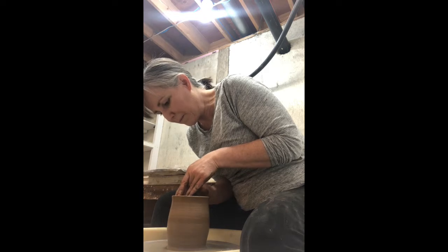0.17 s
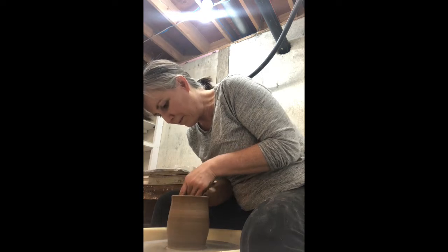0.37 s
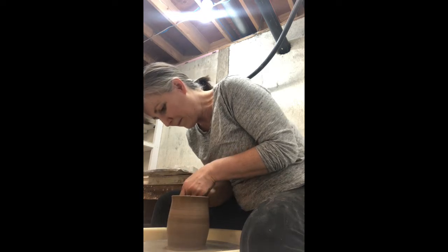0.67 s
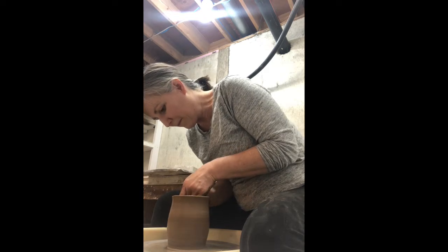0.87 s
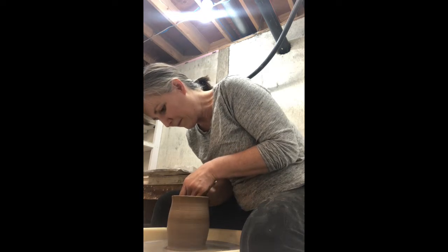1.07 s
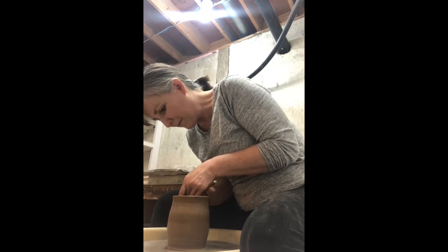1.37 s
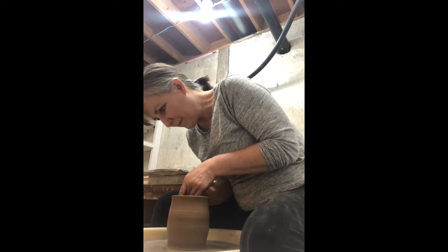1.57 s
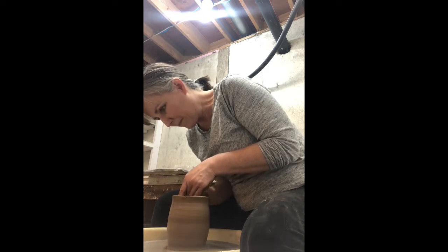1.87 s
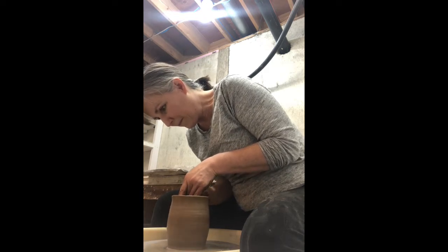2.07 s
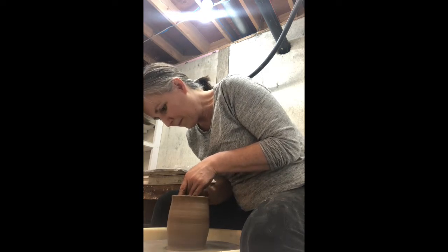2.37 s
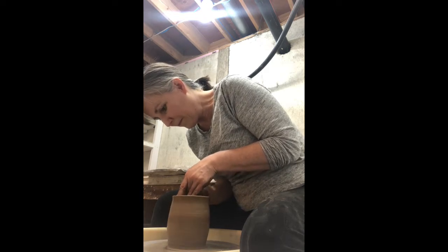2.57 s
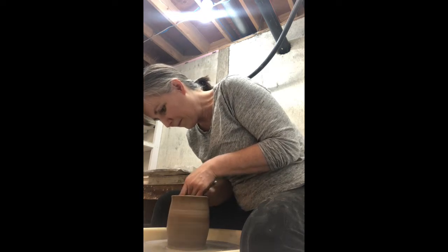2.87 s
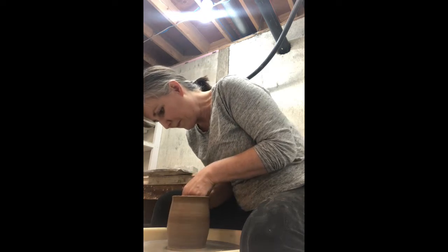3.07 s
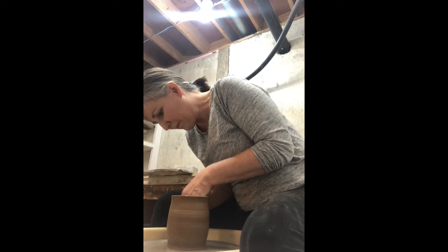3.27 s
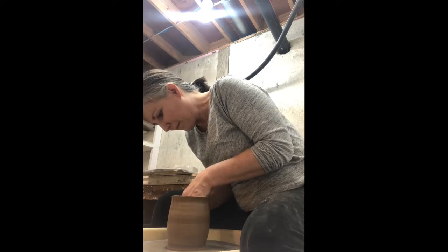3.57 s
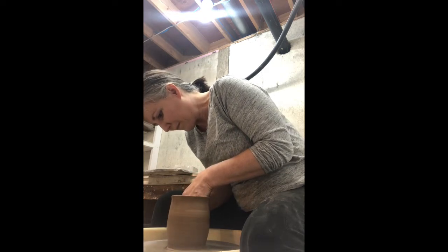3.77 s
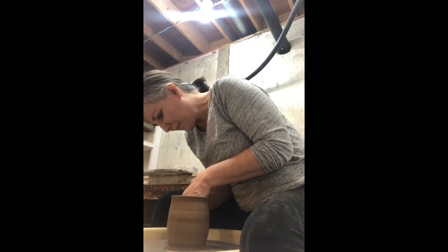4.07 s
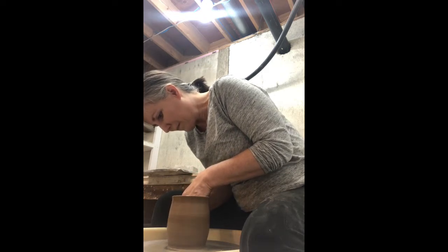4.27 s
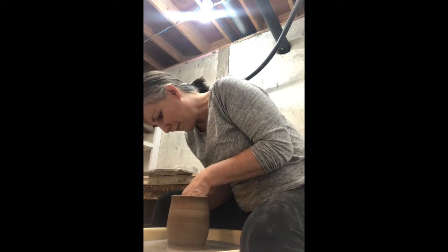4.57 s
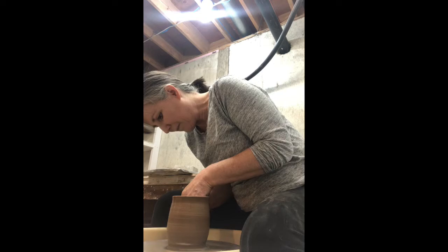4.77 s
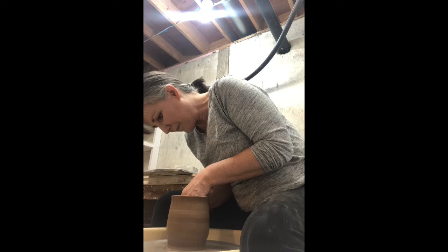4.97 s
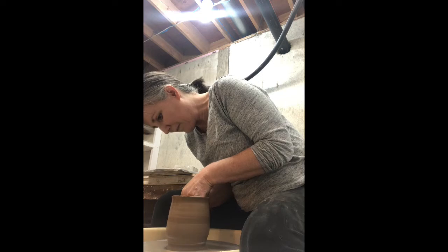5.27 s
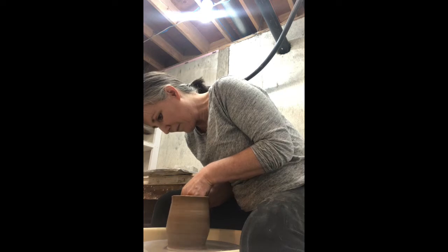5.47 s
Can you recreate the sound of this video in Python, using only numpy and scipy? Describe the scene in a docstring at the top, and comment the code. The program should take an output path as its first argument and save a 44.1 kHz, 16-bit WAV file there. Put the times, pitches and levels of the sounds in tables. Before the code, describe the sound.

From 0 to about 5.7 seconds an electric potter's wheel runs continuously at steady speed, heard close by in a quiet studio. The strongest element is a deep, smooth motor hum around 120 hertz, swelling gently about 2.4 times a second as the wheel head turns. Woven into it is a fast mechanical purr: a cycle repeating about ten times a second, packed with uneven little knocks, catches and rubbing, coloured by hollow housing resonances between roughly 150 and 1250 hertz. Bearings add a soft, grainy low rumble. Faint steady tones and thin metallic singing lie above, with a weak flickering whine near 5.2 kilohertz. From about 0.5 seconds, a minute, almost inaudible squeak near 15 kilohertz recurs every 0.42 seconds, uneven in strength. Slight hiss fills the background. Nothing starts, stops or changes speed; no voice, no distinct handling of clay, and little sense of echo.

```python
"""Electric potter's wheel at steady speed

The motor hums at twice the mains rate and swells a little as each turn of the wheel head loads it.
Its drive knocks, catches and rubs in one looped shaft turn, coloured by the ringing housing and frame.
Bearings rumble as shaped noise; steady sines give machine tones and a thin, flickering whine.
A tiny high squeak returns with every turn of the wheel head, over the even hiss of a quiet studio."""
import sys
import numpy as np
from scipy import signal
from scipy.fft import rfft, irfft
from scipy.io import wavfile

SR = 44100
rng = np.random.default_rng(int(sys.argv[2]) if len(sys.argv) > 2 else 0)


def transcribe(signal):
    """Save signal, clipped to [-1, 1], as a 16-bit WAV file at the path in sys.argv[1]."""
    frames = np.atleast_2d(signal).T
    limited = np.clip(frames, -1, 1)
    pcm = np.round(limited * 32767).astype(np.int16)
    wavfile.write(sys.argv[1], SR, pcm)


N = 248283
TIME = np.arange(N) / SR  # s
FREQS = np.arange(N // 2 + 1) * SR / N  # Hz
SHAFT_HZ, HEAD_HZ = 10.3219, 2.362  # turns per second of the motor shaft and the wheel head


def from_db(db):
    """Decibels to amplitude gain."""
    return 10 ** (np.asarray(db) / 20)


def at_hz(points, hz):
    """Read a spectrum table, with straight lines between points on a log-frequency axis."""
    table_hz, level = np.transpose(points)
    return np.interp(np.log(np.maximum(hz, 1)), np.log(table_hz), level)


def noise(level_db):
    """White noise shaped to the given dB per Hz along FREQS."""
    white = rfft(rng.standard_normal(N))
    return irfft(white * from_db(level_db), N) * np.sqrt(SR / 2)


def drift(rate):
    """Smooth random wander of spread 1 that changes about `rate` times a second."""
    slow = noise(-40 * np.log10(1 + (FREQS / rate) ** 2))
    return slow / slow.std()


def tone(hz, level_db, wander):
    """A sine from a random phase, which then wanders by a spread of `wander` radians."""
    phase = 2 * np.pi * (hz * TIME + rng.random()) + wander * drift(rate=4.5)
    return from_db(level_db) * np.sin(phase)


def frame_db(hz):
    """Lift in dB given by the frame, each resonance a rounded peak around its own pitch."""
    # frame resonances that colour drive and bearings: (centre [Hz], width [Hz], lift [dB])
    resonances = [(171, 7.1, 1), (570, 13, 7.5), (1273, 26, 6.5), (1714, 27, 8), (2406, 28, 10.5),
                  (2813, 39, 10), (3143, 430, 11.5), (3954, 434, 10)]
    return sum(lift_db / (1 + (2 * (hz - centre_hz) / width_hz) ** 2)
               for centre_hz, width_hz, lift_db in resonances)


def studio_hiss():
    """Even background hiss of the quiet studio, as steady shaped noise."""
    # hiss spectrum: (frequency [Hz], level [dB per Hz])
    hiss_spectrum = [(1000, -113), (10000, -120), (15700, -128)]
    return noise(at_hz(hiss_spectrum, FREQS))


def squeaks(first_s=.475, pitch_hz=14950, length_s=.006, level_db=-87, uneven_db=4):
    """A very high, short squeak each time the wheel head comes round, at randomly uneven strength."""
    times = first_s + np.arange(int(N / SR * HEAD_HZ)) / HEAD_HZ
    swell = 0
    for squeak_s in times:
        strength = from_db(uneven_db * rng.standard_normal())
        swell = swell + strength * np.exp(-((TIME - squeak_s) / length_s) ** 2)
    return swell * tone(pitch_hz, level_db, wander=0.89)


def whine(pitch_hz=5228, middle_db=-76.5, flicker_db=1.8):
    """Thin high sine whose level flickers quickly around its middle."""
    return tone(pitch_hz, middle_db + flicker_db * drift(rate=41), wander=0.58)


def machine_tones():
    """Steady sines of the machine that do not follow the shaft."""
    # fixed tones: (frequency [Hz], peak level [dB])
    fixed_tones = [(53.2, -56), (140.6, -53), (149.6, -53), (161.3, -63), (591.5, -66.5), (1042, -60.5),
                   (1157, -70), (1318, -62)]
    return sum(tone(hz, db, wander=0.064) for hz, db in fixed_tones)


def bearings(flicker_db=0.57):
    """Rolling noise that never repeats, coloured by the frame and rippled by the shaft."""
    # rumble and hiss of bearings and belt before the frame lifts it: (frequency [Hz], level [dB per Hz])
    rumble_spectrum = [(25, -112), (42, -85), (55, -75.5), (100, -76), (150, -63), (215, -77), (600, -77.5),
                       (950, -84.5), (1300, -81), (2100, -99), (3600, -107), (5400, -108), (7900, -114),
                       (8500, -128)]
    # level ripple in step with the shaft: (ripples per turn [count], depth [dB])
    shaft_ripple = [(1, .25), (4, .3), (12, .25)]
    ripple_db = sum(depth_db * np.cos(2 * np.pi * (round(per_turn) * SHAFT_HZ * TIME + rng.random()))
                    for per_turn, depth_db in shaft_ripple)
    rolling = noise(at_hz(rumble_spectrum, FREQS) + frame_db(FREQS))
    return rolling * from_db(ripple_db + flicker_db * drift(rate=6.6))


def hum(hum_hz=120.05, swing_db=0.8, heaviest_s=0.09):
    """Magnetic motor hum at twice the mains rate; it swells once for each turn of the wheel head."""
    # hum partials before the swell: (multiple of the hum rate [count], peak level [dB])
    hum_partials = [(1, -35.5), (2, -71), (5, -66)]
    load = np.cos(2 * np.pi * HEAD_HZ * (TIME - heaviest_s))
    steady = sum(tone(round(k) * hum_hz, db, wander=0.025) for k, db in hum_partials)
    return from_db(swing_db * load) * steady


def housing_power(hz):
    """Power with which the sharp modes of the housing ring; their skirts are steep."""
    # housing modes that the drive sets ringing: (centre [Hz], width [Hz], peak level [dB])
    modes = [(155, 6, -50), (181, 23, -44.5), (237, 72, -53), (315, 13, -48), (367, 23, -48.5),
             (407, 31, -45.5), (481, 20, -43.5), (529, 51, -50.5), (583, 12, -51), (1077, 15, -55),
             (1113, 31, -58.5), (1200, 22, -51.5), (1236, 17, -59), (1266, 12, -53)]
    return sum(from_db(db) ** 2 / (1 + (2 * (hz - centre_hz) / width_hz) ** 2) ** 3
               for centre_hz, width_hz, db in modes)


def knock_band(hz, pitch_hz, spread=0.255):
    """Spectrum of a knock that lasts a few cycles of its pitch, scaled to sum to 1."""
    band = np.exp(-(np.log(hz / pitch_hz) / spread) ** 2)
    return band / band.sum()


def knocks(multiple, catch_hz=1120):
    """Force of catches and knocks at each shaft multiple; the shaft runs off centre, so knocks swing."""
    # hard catches, each once a turn: (place [share of the turn], relative force [dB])
    catches = [(.5764, -33.5), (.6786, -33.5)]
    # evenly spaced knocks: (knocks per turn [count], first knock [share of the turn],
    # relative force [dB], pitch [Hz], fall of pitch [Hz per s], heaviest place [share of the turn],
    # swing of strength [dB], swing of timing [turns])
    knock_trains = [(7, .096, -37, 195, 5180, .886, 8, .023), (8, .046, -33, 450, 4440, .208, .8, -.022),
                    (12, .0316, -42, 1120, 27300, .794, 1.7, -.0214),
                    (11, .04, -59, 3020, 300000, .6, 4, .009)]
    hz = np.maximum(multiple, 1) * SHAFT_HZ
    catch_force = sum(from_db(db) * np.exp(-2j * np.pi * multiple * share) for share, db in catches)
    force = knock_band(hz, catch_hz) * catch_force
    for per_turn, first, db, pitch_hz, fall_hz_per_s, heaviest, swing_db, swing_turns in knock_trains:
        share = first + np.arange(round(per_turn)) / round(per_turn)
        off_centre = 2 * np.pi * (share - heaviest)
        strength = from_db(db + swing_db * np.cos(off_centre))
        place = share + swing_turns * np.sin(off_centre)
        train = strength @ np.exp(-2j * np.pi * np.outer(place, multiple))
        # high notes cross the housing first, so each knock falls in pitch
        fall = np.exp(1j * np.pi * (hz - pitch_hz) ** 2 / fall_hz_per_s)
        force = force + train * fall * knock_band(hz, pitch_hz)
    return force


def shaft_turn(rub_db=-13, size=8192):
    """One drive turn: knocks and rubbing set the phases, frame and housing the level of each multiple."""
    # drive level between the housing modes, before frame lift and scatter: (frequency [Hz], level [dB])
    drive_spectrum = [(35, -102), (85, -71.5), (150, -67.5), (290, -74), (590, -62.5), (680, -74),
                      (860, -68), (990, -75.5), (1270, -75.5), (1480, -82.5), (2520, -87.5), (3050, -95),
                      (3550, -99.5), (4500, -99), (6000, -102.5), (9000, -122)]
    # thin singing of the drive, before housing ring joins: (multiple of the shaft rate [count], level [dB])
    singing = [(71, -62), (194, -77), (234, -79), (264, -76), (268, -74), (295, -77), (304, -74),
               (315, -73), (368, -81), (408, -82), (432, -88)]
    multiple = np.arange(size // 2 + 1)
    hz = np.maximum(multiple, 1) * SHAFT_HZ
    level_db = at_hz(drive_spectrum, hz) + frame_db(hz)
    rubbing = from_db(level_db + rub_db) * np.exp(2j * np.pi * rng.random(len(hz)))
    force = rubbing + knocks(multiple)
    # the crowded higher modes of the frame favour some multiples and swallow others
    scatter_db = at_hz([(1000, 1.5), (3000, 3)], hz)
    level_db = level_db + scatter_db * np.minimum(rng.standard_normal(len(hz)), 2)
    for k, db in singing:
        level_db[round(k)] = db
    strength = np.hypot(from_db(level_db), np.sqrt(housing_power(hz)))
    timing = force / abs(force)  # phase only
    return irfft(strength * timing * (multiple > 0)) * size / 2


def drive(slip_turns=0.00043, flutter_turns=0.00005):
    """The same turn repeats at the shaft rate, which wavers very slightly, both slowly and fast."""
    turn = shaft_turn()
    angle = SHAFT_HZ * TIME + slip_turns * drift(rate=0.7) + flutter_turns * drift(rate=110)  # turns
    return np.interp(angle, np.arange(len(turn)) / len(turn), turn, period=1)


def scene():
    """The whole machine, heard from close by."""
    background = studio_hiss() + squeaks() + whine() + machine_tones()
    return (background + bearings() + hum() + drive())[None]


def record(dry, cutoff_hz=15750):
    """The top is cut steeply by a low-pass filter."""
    low_pass = signal.ellip(12, .1, 80, cutoff_hz, fs=SR, output="sos")  # ripple and stopband in dB
    return signal.sosfilt(low_pass, dry)


dry = scene()
out = record(dry)
transcribe(out)
```